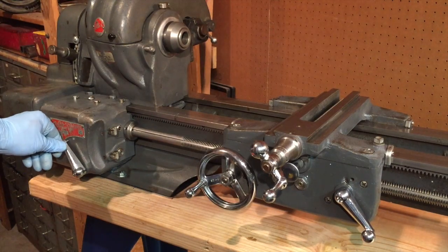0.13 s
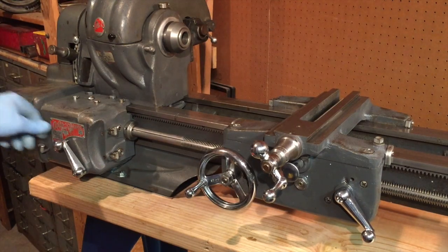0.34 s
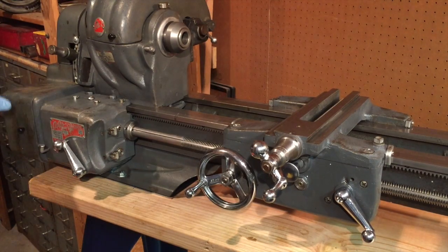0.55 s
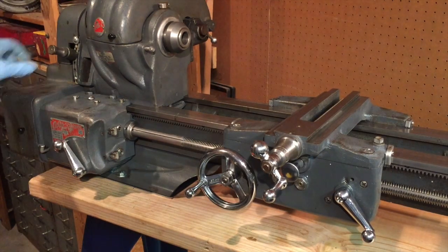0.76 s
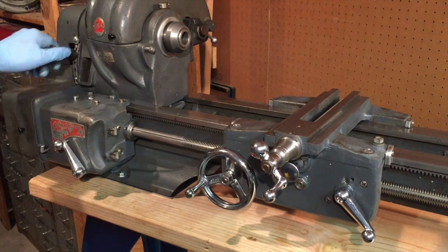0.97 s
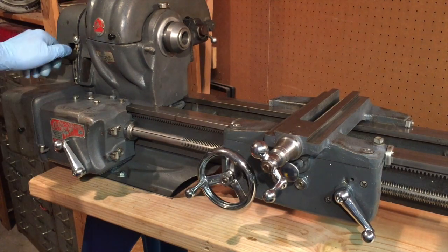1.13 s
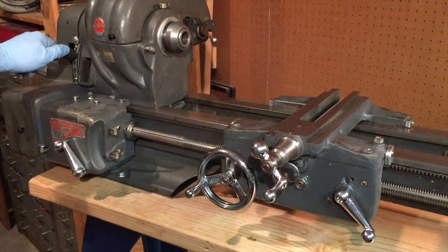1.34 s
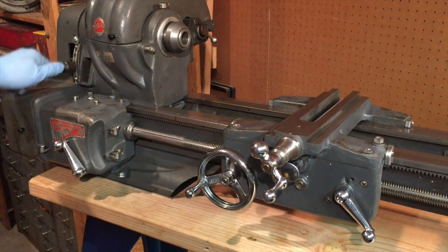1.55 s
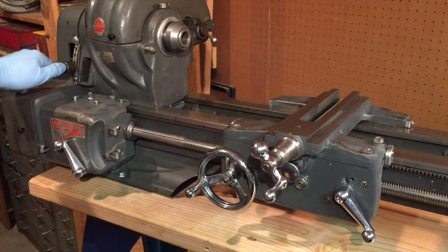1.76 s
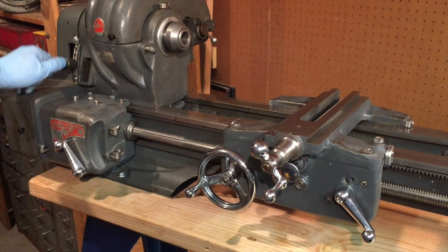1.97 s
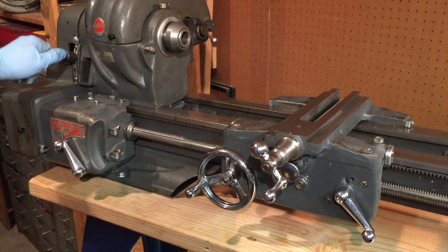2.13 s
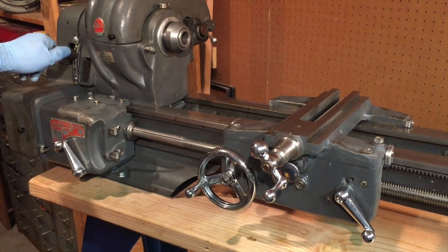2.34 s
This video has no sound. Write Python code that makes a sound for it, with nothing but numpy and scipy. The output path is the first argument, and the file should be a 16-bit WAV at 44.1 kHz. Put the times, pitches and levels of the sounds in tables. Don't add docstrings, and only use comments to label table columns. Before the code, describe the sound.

Iron lever clacks on a heavy machine tool, preceded by faint glove rubs, in a small workshop

```python
import sys
import numpy as np
from scipy import signal
from scipy.fft import rfft, irfft
from scipy.io import wavfile
from scipy.ndimage import uniform_filter1d

SR = 44100
rng = np.random.default_rng(int(sys.argv[2]) if len(sys.argv) > 2 else 0)


def volts_from_decibels(level):
    exponent = np.asarray(level, float) / 20
    return 10 ** exponent


def unload_wav(signal):
    wavfile.write(
        sys.argv[1],
        SR,
        np.round(np.clip(np.atleast_2d(signal).T, -1, 1) * 32767).astype(np.int16),
    )


N = 105840
RING_SAMPLES = 16000
LONGEST_T60_S = 0.24


def evened(x):
    return x / np.sqrt(np.mean(x ** 2) + 1e-20)


def read(points, hz):
    f, value = np.transpose(points)
    return np.interp(np.log(hz + 1), np.log(f + 1), value)


def coloured(x, points):
    gain = volts_from_decibels(read(points, np.fft.rfftfreq(len(x), 1 / SR)))
    return evened(irfft(rfft(x) * gain, len(x)))


def filtered(x, order, hz, kind):
    return signal.sosfilt(signal.butter(order, hz, kind, fs=SR, output="sos"), x)


def add(mix, start_s, sound):
    part = mix[round(start_s * SR):][:len(sound)]
    part += sound[:len(part)]


def wavering(count, size, depth):
    raw = rng.standard_normal((count, size // 50))
    raw = evened(uniform_filter1d(uniform_filter1d(raw, size=6), size=6))
    return 1 + depth * uniform_filter1d(np.repeat(raw, 50, axis=1), size=50)


# pitch_hz [Hz], level_db [dB per Hz]
AIR_SPECTRUM = [(15, -37), (30, -15), (59, -2), (221, -10), (253, -14), (297, -10.5), (410, -15),
                (2170, -20.5), (15500, -30)]
AIR_DB = -53


def air():
    lumps = uniform_filter1d(uniform_filter1d(rng.standard_normal(N), size=1500), size=1500)
    return volts_from_decibels(AIR_DB + 0.49 * evened(lumps)) * coloured(rng.standard_normal(N), AIR_SPECTRUM)


def favoured(hz, db, t60):
    t = np.arange(RING_SAMPLES) / SR
    swell = 1 - np.exp(-t / (0.0012 + 1 / hz))
    fade = volts_from_decibels(db - 60 * t / min(t60, LONGEST_T60_S + 30 / hz))
    swing = wavering(count=1, size=len(t), depth=0.28)[0]
    cycles = hz * np.cumsum(1 + 0.045 * (swing[::-1] - 1)) / SR
    return swell * fade * swing * np.sin(2 * np.pi * cycles)


# pitch_hz [Hz], level_db [dB], t60_s [s]
LEFTOVER_MODES = [(481, -35.5, 0.12), (556, -27.5, 0.043), (1685, -41, 0.2), (1730, -42, 0.1),
                  (2660, -39.5, 0.075)]


def leftover():
    mix = np.zeros(N)
    for hz, db, t60 in LEFTOVER_MODES:
        add(mix, 0, favoured(hz, db, t60))
    return mix


def ring(modes, dense, chatter):
    t = np.arange(RING_SAMPLES) / SR
    hz, db, t60 = np.transpose(modes)[:, :, None]
    luck = rng.standard_normal((len(modes), 2))
    spread_db = 2.5 * luck[:, :1]
    detune = 1 + 0.0051 * luck[:, 1:]
    fade = volts_from_decibels(db + spread_db - 60 * t / np.minimum(t60, LONGEST_T60_S))
    beats = wavering(count=len(modes), size=len(t), depth=0.5)
    tones = (fade * beats * np.sin(2 * np.pi * hz * detune * t)).sum(0)
    tones = tones / np.sqrt(np.sum(volts_from_decibels(2 * db)) / 2)

    low_hz, high_hz, dense_db, dense_t60 = dense
    decay = volts_from_decibels(-120 * t / dense_t60) + volts_from_decibels(-120 * t / 0.014)
    energy = abs(signal.fftconvolve(chatter ** 2, decay))[:len(t)]
    haze = filtered(rng.standard_normal(len(t)) * np.sqrt(energy), 3, [low_hz, high_hz], "bandpass")
    haze = haze * np.sqrt(SR / 2 / (high_hz - low_hz))
    return signal.fftconvolve(tones, chatter)[:len(t)] + volts_from_decibels(dense_db) * haze


# [dB, how much the casting rasps along]
GLOVE_STROKES = [(0.201, -68, -10), (.53, -56.5, 8), (.548, -48.5, 0), (.592, -46.5, 3.5),
                 (0.605, -38.5, -12), (.64, -57.5, 12.5), (0.734, -51, 3.5), (0.761, -38, -6),
                 (0.883, -39.5, -3.5), (0.898, -51, -9), (.94, -39.5, -0.5), (0.984, -29.5, -5),
                 (1.09, -30, 4), (1.261, -49, 8.5), (1.33, -47, 7.5), (1.404, -51.5, 6.5), (1.446, -37, 14),
                 (1.55, -53.5, 9.5)]
# pitch_hz [Hz], level_db [dB per Hz]
RUB_SPECTRUM = [(120, -46), (200, -10.5), (544, -11), (1050, 1.5), (1210, -4), (1450, 0.5), (1680, -7.5),
                (6470, 0), (15500, -8)]
RASP_SPECTRUM = [(150, -1.5), (400, -13.5), (1000, -11), (2000, -2.5), (4000, -0.5), (8000, 8)]
# pitch_hz [Hz], level_db [dB], t60_s [s]
CASTING_MODES = [(517, -27, 0.06), (556, 3, 0.38), (726, -4.5, 0.45), (878, 4.5, 0.3), (1060, 6, 0.36),
                 (1295, 6, 0.66), (1444, 5.5, 0.24), (1730, 10.5, 0.061), (2289, 6.5, 0.12),
                 (2635, 8.5, 0.024), (2918, 3, 0.041)]
# low_hz [Hz], high_hz [Hz], level_db [dB re modes], t60_s [s]
DENSE_OVERTONES = [
    (180, 605, -1.5, 0.25),
    (486, 2370, 2.5, 0.19),
    (2670, 5320, 3, 0.16),
    (8260, 9650, 2, 0.11),
]
GRAINS_PER_S, GRAIN_SPREAD_DB, SCRATCH_DB = 7000, -0.5, 1.1
RUB_DB, RASP_DB = -3, -9.5
GRIP_PLACES, GRIP_MOVES_S, GRIP_DAMPING_S = 5, 0.045, 0.016


def glove():
    start_s, pressure_db, weight_db = np.transpose(GLOVE_STROKES)
    t = np.arange(N) / SR
    struck = rng.random((2, N)) < GRAINS_PER_S / SR
    sizes = volts_from_decibels(GRAIN_SPREAD_DB * np.minimum(rng.exponential(1, (2, N)), 4))
    swings = wavering(count=2, size=N + 50, depth=1)[:, :N]
    slips = struck * rng.standard_normal((2, N)) * sizes * volts_from_decibels(SCRATCH_DB * (swings - 1))

    place = rng.integers(0, GRIP_PLACES, N)[(t / GRIP_MOVES_S).astype(int)]
    damping = np.exp(-t[:3000] / GRIP_DAMPING_S)
    rasp = np.zeros(N)
    for k in range(GRIP_PLACES):
        damped = ring(CASTING_MODES, DENSE_OVERTONES[1], np.ones(1))[:3000] * damping
        rasp += signal.fftconvolve(slips[1] * (place == k), damped)[:N]

    lift_off_db = 200 * np.maximum(t - start_s[-1], 0)
    level = volts_from_decibels(np.interp(t, start_s, pressure_db, left=-100) - lift_off_db)
    rub = volts_from_decibels(RUB_DB) * coloured(slips[0], RUB_SPECTRUM)
    rasp = volts_from_decibels(RASP_DB + np.interp(t, start_s, weight_db)) * coloured(rasp, RASP_SPECTRUM)
    return level * (rub + rasp)


# start_s [s], pitch_hz [Hz], level_db [dB], t60_s [s]
FAVOURED_MODES = [(0.751, 1330, -31, 0.08), (0.753, 922, -38, 0.13), (1.032, 1506, -34.5, 0.17),
                  (1.11, 545, -31, 0.1), (1.19, 108, -39.5, 0.23), (1.19, 187, -32, 0.16),
                  (1.19, 737, -35, 0.077), (1.597, 1444, -19, 0.065), (1.64, 670, -25.5, 0.17),
                  (1.689, 1775, -22.5, 0.064), (1.724, 327, -16, 0.15), (1.793, 1754, -17.5, 0.13),
                  (1.84, 556, -16.5, 0.19), (1.842, 2658, -14, 0.065), (1.842, 726, -17.5, 0.5),
                  (1.845, 878, -20.5, 0.22), (1.849, 1325, -12, 0.029), (1.925, 2635, -37, 0.12),
                  (0.601, 1608, -48.5, 0.31), (1.859, 100, -35.5, 0.34), (1.931, 163.6, -42.5, 0.32),
                  (2.065, 335.4, -25.5, 0.15), (2.07, 735, -30, 0.23), (2.079, 1047, -30, 0.14),
                  (2.27, 1730, -8, 0.053), (1.688, 71.4, -40.5, 0.39), (2.251, 1042, -28.5, 0.18),
                  (2.312, 1004, -22.5, 0.13), (2.275, 346, -26.5, .15),
                  (0.75, 1540, -29, 0.038), (.792, 920, -31, 0.064), (0.795, 3720, -38, .06),
               (.805, 1330, -42, 0.066), (.833, 900, -36, 0.046), (.864, 2760, -41.5, 0.093),
               (.867, 1250, -35.5, 0.05), (.63, 1360, -46.5, 0.11), (1.579, 1730, -28, 0.071),
               (1.58, 1060, -27, 0.16), (1.581, 9400, -41.5, .08), (1.594, 2770, -15.5, 0.055),
               (1.592, 3250, -23, 0.058), (1.606, 1770, -25.5, 0.13), (1.647, 1397, -22, .1),
               (1.68, 4540, -22, 0.035), (1.693, 4260, -24.5, 0.031), (1.101, 196, -34.5, 0.13),
               (1.12, 2070, -37, .1), (1.647, 4160, -19, 0.017), (1.752, 9530, -17.5, 0.04),
               (1.68, 3430, -23, 0.05), (1.752, 1730, -20, .05), (1.794, 2877, -20.5, 0.088),
               (1.85, 650, -18, 0.19), (1.86, 1295, -23, 0.14), (2.054, 1730, -35.5, 0.12),
               (2.056, 2910, -41.5, 0.041), (2.059, 2610, -40, 0.043), (2.072, 1410, -29.5, 0.065),
               (2.074, 1152, -28, 0.072), (2.175, 2240, -50, 0.066), (2.177, 1910, -55, 0.095),
               (1.935, 1357, -41, .12), (2.249, 1500, -25, 0.034), (2.269, 3760, -16, 0.053),
               (2.27, 4637, -18, 0.029), (2.278, 2336, -18, 0.086), (2.281, 1097, -18.5, 0.076),
               (2.3, 1747, -23.5, 0.11), (2.342, 1060, -25.5, 0.11)]


def favoured_modes():
    mix = np.zeros(N)
    for start_s, hz, db, t60 in FAVOURED_MODES:
        add(mix, start_s, favoured(hz, db, t60))
    return mix


# start_s [s], level_db [dB]
TICKS_HEARD = [(.604, -54), (.608, -30), (0.833, -30), (1.582, -33), (1.598, -32.5), (1.647, -33),
               (1.68, -47), (1.705, -37), (1.7519, -9), (1.965, -36.5), (2.2702, -19.5)]


def ticks():
    mix = np.zeros(N)
    t = np.arange(6000) / SR
    fade = np.exp(-t / 0.00046) + volts_from_decibels(-14.5) * np.exp(-t / 0.031)
    for start_s, db in TICKS_HEARD:
        bright = filtered(rng.standard_normal(len(t)), 2, 5300, "highpass")
        add(mix, start_s, volts_from_decibels(db) * bright * fade)
    return mix


# pitch_hz [Hz], level_db [dB], t60_s [s]
BENCH_MODES = [(240, -4, 0.16), (270, 17.5, 0.4), (327, 17.5, .25), (394.5, 14, 0.14)]
LEVER_MODES = [(3510, 8, 0.05), (3880, 5, 0.08), (3730, -8, 0.1), (4050, -6, 0.1), (4560, 2, 0.06)]
PIN_MODES = [(8764, -1, .08), (9345, -1, .07), (9900, -3, .05)]


def contact(row, rise_s, chatter_s, db, first):
    _, casting_db, bench_db, lever_db, pin_db = row
    t = np.arange(3000) / SR
    envelope = (1 - np.exp(-(t + 1 / SR) / rise_s)) * np.exp(-t / chatter_s)
    chatter = rng.standard_normal(len(t)) ** 3 * envelope
    chatter = chatter / np.linalg.norm(chatter) + first * (t == 0)
    chatter = chatter / np.linalg.norm(chatter)
    levels_db = bench_db, 0, lever_db, pin_db
    parts = BENCH_MODES, CASTING_MODES, LEVER_MODES, PIN_MODES
    rings = [volts_from_decibels(g) * ring(m, d, chatter) for g, m, d in zip(levels_db, parts, DENSE_OVERTONES)]
    return volts_from_decibels(casting_db + db) * sum(rings)


# start_s [s], casting_db [dB], then bench_db, lever_db, pin_db [dB re casting]
SHARP_KNOCKS = [
    (0.605, -42.5, -9, 12, 6.5),
    (0.752, -33.5, -10, -2, -9),
    (0.834, -45, -35, 3, 14.5),
    (1.097, -23, -8.5, -14, -18),
    (1.599, -11.5, -8, -4, -34),
    (1.647, -15, -3.5, -5.5, -29),
    (1.751, -14, -5.5, -1, -7),
    (1.84, -2, -5.5, -8, -31),
    (2.249, -29.5, -38, -4.5, -18),
    (2.27, -14.5, -26, 8, -4),
]


def knocks():
    mix = np.zeros(N)
    for row in SHARP_KNOCKS:
        add(mix, row[0], contact(row, rise_s=0.000086, chatter_s=0.0012, db=-14.5, first=1))
    return mix


SHOVE_LEAD_S = 0.004


def shove(row):
    return contact(row, rise_s=0.0017, chatter_s=0.025, db=-13, first=0)


# start_s [s], casting_db [dB], then bench_db, lever_db, pin_db [dB re casting]
SOFT_SHOVES = [(0.794, -35.5, -18, -4, -21), (0.864, -36.5, -25, -25, -2), (1.124, -22.5, -23, -11, -36),
               (1.191, -52, 1, -11, -21), (1.45, -31, -8, 0.5, -15), (1.581, -18, -5, -6.5, -18),
               (1.62, -17, 6, -29, -25), (1.691, -17.5, -5.5, -7.5, -30), (1.724, -19, 0, -14, -19),
               (1.793, -11, -12.5, -6, -17), (1.968, -54.5, 21, -31, 6), (2.059, -30.5, 7, -33, -31),
               (2.262, -17, -29.5, -10, -29), (2.309, -14, -9, -10, -27)]


def shoves():
    mix = np.zeros(N)
    for row in SOFT_SHOVES:
        add(mix, row[0] - SHOVE_LEAD_S, shove(row))
    return mix


# start_s [s], casting_db [dB], then bench_db, lever_db, pin_db [dB re casting]
SOFT_THUDS = [
    (1.86, -20, -11, -30, -40),
    (1.893, -17, -4, -30, -40),
    (2.07, -15, -3.5, -30, -38),
    (2.112, -29, 8.5, -30, -40),
    (2.281, -11, -7, -30, -37),
]


def thuds():
    mix = np.zeros(N)
    fade = volts_from_decibels(-60 * np.arange(RING_SAMPLES) / SR / 0.16)
    for row in SOFT_THUDS:
        add(mix, row[0] - SHOVE_LEAD_S, filtered(shove(row), 3, 1500, "lowpass") * fade)
    return mix


# pitch_hz [Hz], t60_s [s]
SHOP_DECAY = [(200, 0.47), (1000, 0.26), (4000, 0.34), (12000, 0.16)]
SHOP_DB = -13


def shop(x):
    taps = np.zeros(SR // 2)
    at = np.arange(200, len(taps) - 20, 20)
    taps[at + rng.integers(0, 20, len(at))] = rng.choice([-1., 1.], len(at))
    hz, t, z = signal.stft(taps, SR, nperseg=256)
    fade = volts_from_decibels(-60 * t / read(SHOP_DECAY, hz)[:, None])
    tail = signal.istft(z * fade, SR, nperseg=256)[1]
    return signal.fftconvolve(x, tail / np.linalg.norm(tail))[:N]


def scene():
    struck = filtered(knocks() + shoves() + thuds(), 3, 157, "highpass")
    near = leftover() + glove() + favoured_modes() + ticks() + struck
    return (near + volts_from_decibels(SHOP_DB) * shop(near) + air())[None]


def roll_off(x):
    return signal.sosfilt(signal.butter(12, 16460, fs=SR, output="sos"), x)


def record(dry):
    ceiling = 0.62
    held = ceiling * np.tanh(dry / ceiling)
    mix = filtered(held, 2, 28, "highpass")
    mix = signal.sosfilt(signal.cheby2(12, 45, 15650, fs=SR, output="sos"), mix)
    return roll_off(mix)


dry = scene()
out = record(dry)
unload_wav(out)
```